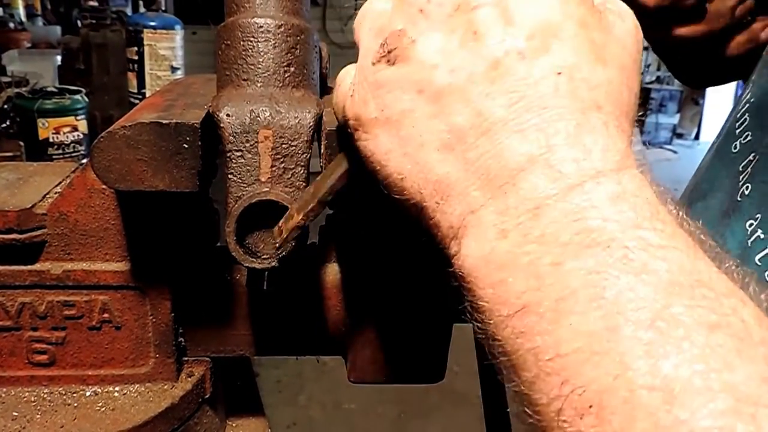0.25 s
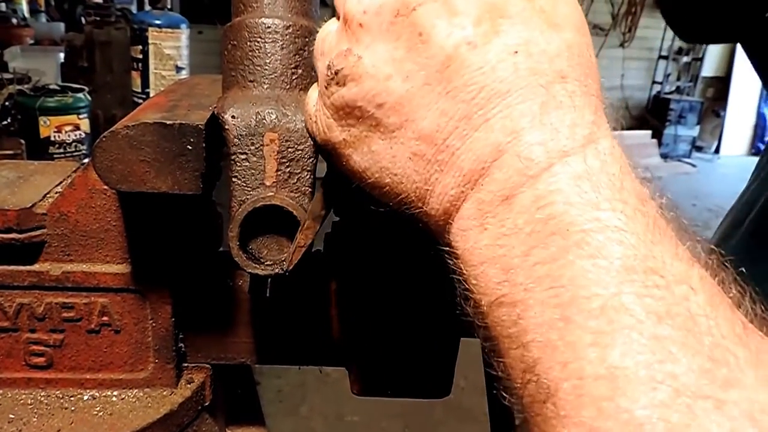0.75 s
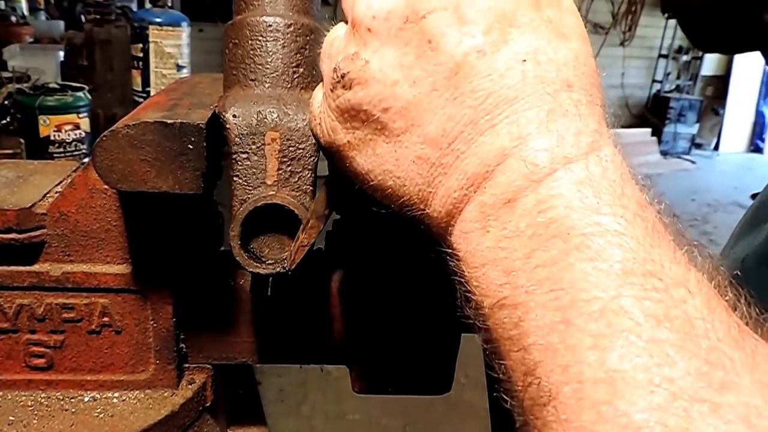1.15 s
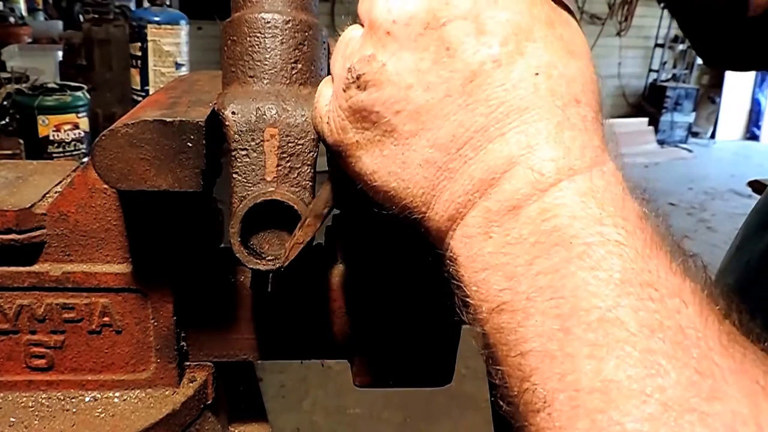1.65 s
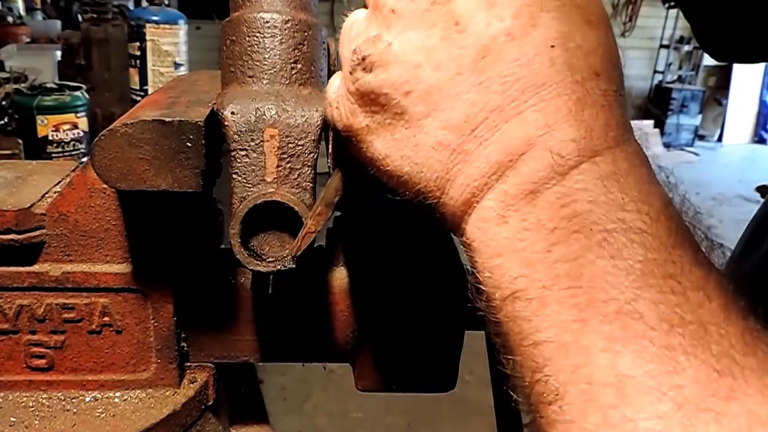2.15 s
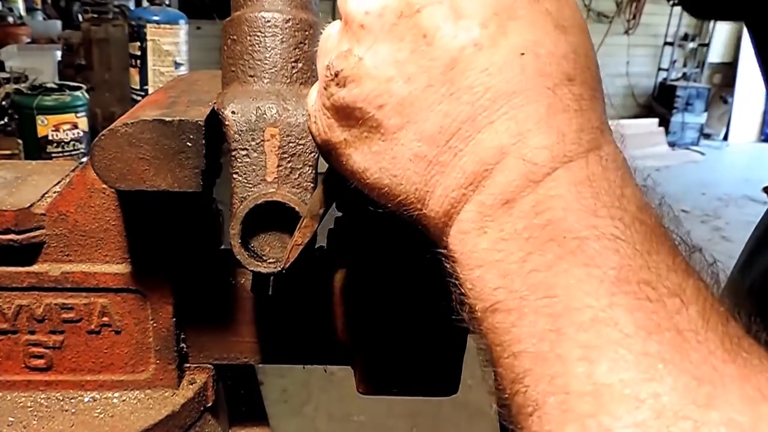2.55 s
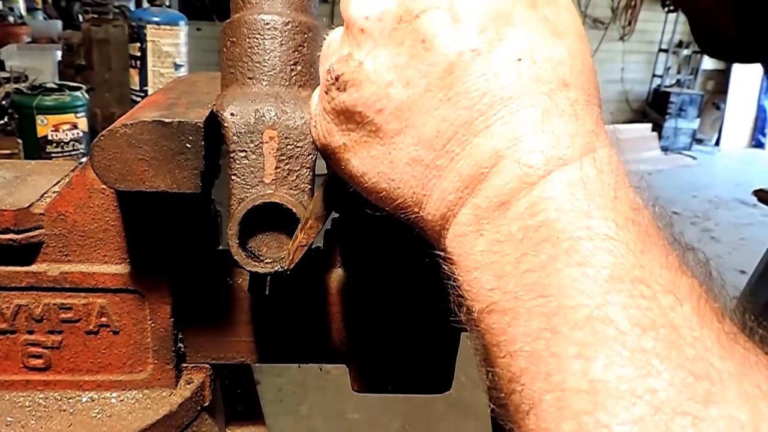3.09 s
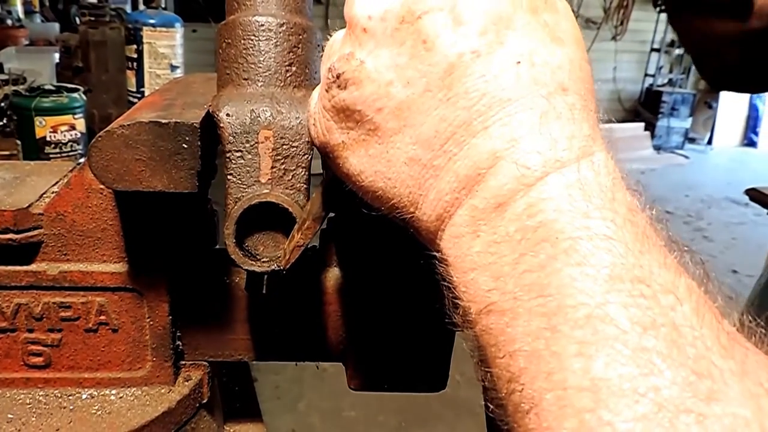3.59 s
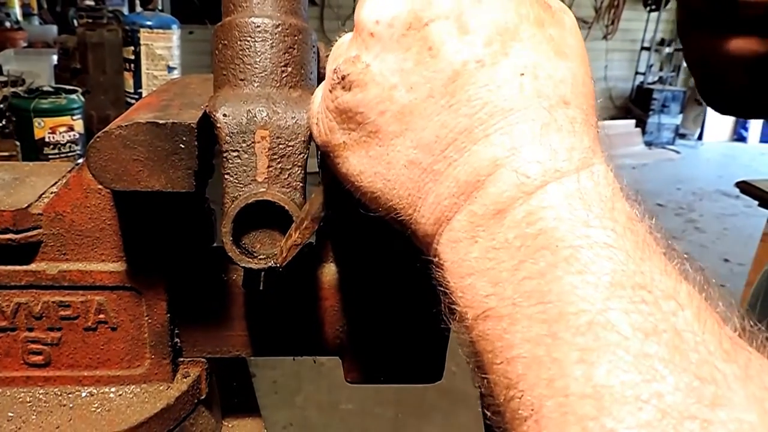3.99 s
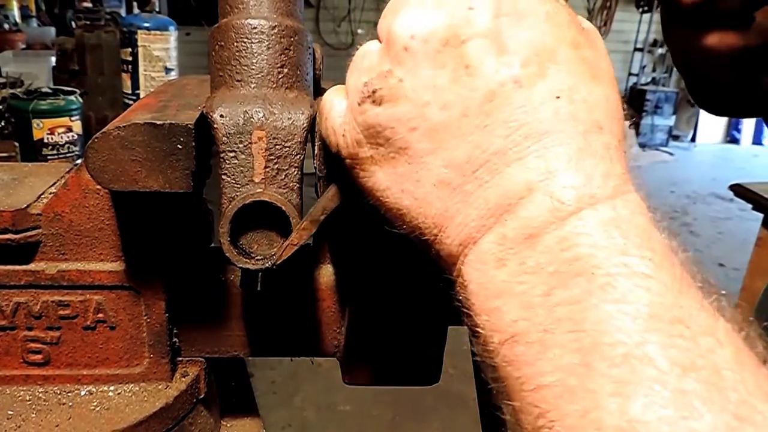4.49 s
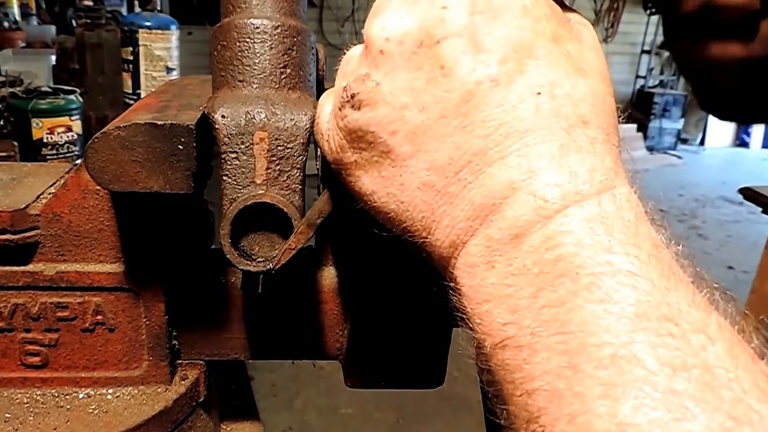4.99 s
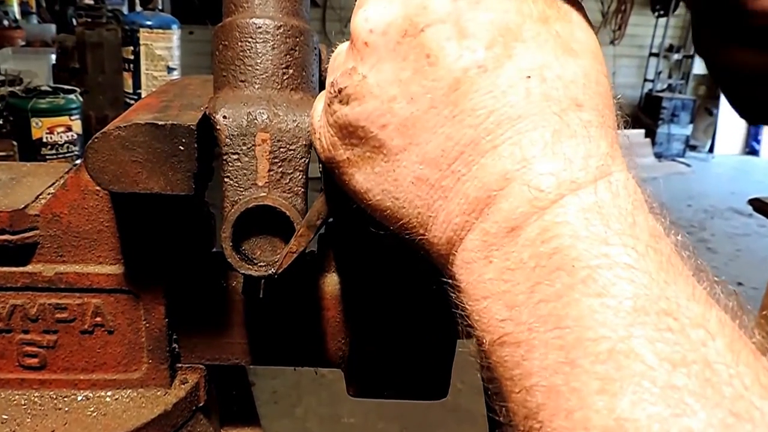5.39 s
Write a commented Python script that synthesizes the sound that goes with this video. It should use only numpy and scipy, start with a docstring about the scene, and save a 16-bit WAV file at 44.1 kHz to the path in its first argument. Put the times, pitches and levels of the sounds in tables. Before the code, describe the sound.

A steel hammer strikes a chisel against a metal part clamped in a bench vise, sharp uneven blows over a low swelling rumble.

```python
"""Hammer and chisel at a bench vise

A steel hammer drives a chisel against a shaft yoke clamped in a bench vise, close to the microphone.
Each blow mixes bursts of noise (crack, edge, noisy thud) with fading sine waves (bench thump, steel ring).
Light taps leave the chisel free to sing, heavy blows seat it and ring the hammer head instead.
An echo of shaped noise follows; the hardest blows overload the input, which rounds off their peaks.
Behind it, shaped noise rumbles and a wavering sine hums, swelling and sinking about every two seconds."""
import sys
import numpy as np
from scipy import signal
from scipy.fft import rfft, irfft
from scipy.io import wavfile
from scipy.ndimage import uniform_filter1d

SR = 44100
rng = np.random.default_rng(int(sys.argv[2]) if len(sys.argv) > 2 else 0)


def unload_audio(sound):
    """Save the sound as a 16-bit wav file, at the path given as the first command line argument."""
    columns = np.transpose(np.atleast_2d(sound))
    # keep every value between -1 and 1, then stretch to whole-number steps
    steps = np.round(np.clip(columns, -1, 1) * 32767)
    wavfile.write(sys.argv[1], SR, steps.astype(np.int16))


N = 248724  # length in samples

# level of the background, before rumble and hum get their own: (t/s, level/dB)
SWELL = [(0, -40.0), (0.26, -38.5), (0.85, -23.5), (0.98, -28.0), (1.17, -27.5), (1.7, -38.5),
         (2.15, -40.5), (2.87, -23.5), (3.15, -28.5), (3.75, -39.5), (4.5, -45.5), (4.95, -35.5),
         (5.35, -35.5), (5.64, -36.0)]
# colour of the rumble: (f/Hz, level per Hz/dB)
RUMBLE = [(47, -38.5), (80, 3.5), (117, -11.5), (162, 0), (227, -11), (264, -1.5), (326, -6.5), (379, -3.5),
          (459, -5.5), (645, -10.5), (833, -11), (1170, -15), (3470, -35), (6580, -49), (13000, -57),
          (15000, -75)]
# how alike the rumble is left and right, 1 = the same: (f/Hz, likeness)
LIKENESS = [(60, 0.93), (300, 1), (700, 0.88), (1400, 0.57), (3000, 0), (7000, 0.051)]
# every blow or light tap; hardness, skid and looseness are 0 for the usual square blow:
# (t/s, force/dB, hardness of the contact/dB, skid/dB, looseness of the chisel/dB, clank f/Hz)
BLOWS = [(0.447, -34.5, -8, 0, 4, 2000), (0.632, -31, -15, 3, 4, 1800), (0.8986, -17.5, -20, 1, 0, 1800),
         (1.202, -8.5, -3, 0, 8, 4300), (1.499, -13, 0, 0, 3, 2460), (1.7864, -19, 3, -1, 0, 2460),
         (2.344, -31, -14, 0, 0, 1800), (2.494, -33, 0, -2, 0, 2500), (2.932, -7, -3, 1, -3, 4370),
         (3.2506, -9, 0, 0, -2, 4400), (3.571, -14, 4, -1, -3, 4240), (3.8897, -18, 5, -1, 1, 4240),
         (4.2304, -45, 24, -4, 0, 4800), (4.9867, -27, -7, 9, 0, 2400), (5.4369, -15.5, -1.5, 1, 0, 2600)]
# colour of the crack: (f/Hz, level per Hz/dB)
CRACK = [(500, -6), (1300, -1), (1900, -5), (2450, 5.5), (3200, -0.5), (3700, 1), (4350, -1.5), (5100, -15),
         (7000, -24), (12000, -61)]
# colour of the contact edge: (f/Hz, level per Hz/dB)
EDGE = [(3000, -15), (5000, 2), (5900, -3.5), (7400, 4), (9400, -6.5), (11300, -3), (12200, 1), (13400, -9),
        (15300, -8), (16300, -23)]
# ringing tones of vise and bench: (f/Hz, level/dB, time to fade by 60 dB/s)
BENCH = [(67.6, -14, 0.26), (139.5, -13.5, 0.037), (184.8, -4.5, 0.091), (286.4, -1, 0.068),
         (326.4, -0.5, 0.063), (398, -10, 0.091), (465.7, -11.5, 0.095), (542, 3.5, 0.052),
         (625.3, 5.5, 0.044), (768, -8.5, 0.034), (878, -9, 0.083), (1037, -3.5, 0.053),
         (1196, -11.5, 0.067), (1339, -3, 0.038), (1498, -8, 0.071), (1603, -10.5, 0.049)]
# colour of the rough, noisy part of the thud: (f/Hz, level per Hz/dB)
NOISY_THUD = [(40, -24.5), (120, -13.5), (250, 5.5), (420, 4), (650, 4.5), (1000, -4), (1500, -8.5),
              (2000, -11), (3500, -34), (9000, -66)]
# ringing tones of the hammer head and the seated chisel: (f/Hz, level/dB, time to fade by 60 dB/s)
STEEL = [(2480, -2, .3), (3630, -2, .25), (3900, -2, .35), (4270, -1, .25), (4365, -4, .3), (5240, -12, .3),
         (7800, -16, .3), (12025, 5, .3), (12190, 0, .18), (12300, -6, .15), (12810, -8, .23),
         (15000, -14, .18)]
# ringing tones of the chisel when it sits loosely: (f/Hz, level/dB, time to fade by 60 dB/s)
CHISEL = [(4790, -3, .45), (4900, -1, .25), (8473, -5, .5), (8600, -4, .4), (10480, -8, .3),
          (13320, -2, .2)]
# how long the workshop echo lasts: (f/Hz, time to fade by 60 dB/s)
ROOM_T60 = [(100, .5), (500, 0.4), (2000, 0.57), (4500, 0.53), (8000, 0.52), (13000, 0.42)]
# how strong the workshop echo is: (f/Hz, level/dB)
ROOM_LEVEL = [(100, -34), (400, -17), (1200, -8), (3000, -13), (7000, -13.5), (12000, -13), (14000, -33)]

# what a blow sets off: (level against its force/dB, gain per dB of hardness/dB)
CRACK_LAW = (-7.3, .55)
EDGE_LAW = (-18, .98)
THUMP_LAW = (-1.5, 0)
NOISY_THUD_LAW = (-7, -.3)
STEEL_LAW = (-38.5, .95)
CHISEL_LAW = (-49, .95)

HUM_HZ = 59.2
CUTOFF_HZ = 16100
USUAL_FORCE_DB = -14
NOISY_THUD_PER_SKID = 0.55  # dB per dB: a skidding blow also has a stronger noisy thud
SEATING = 0.55  # dB of chisel ring damped per dB of force
THUMP_DULLING = 0.25  # dB per octave lost per dB of force: heavy blows reach the low modes of the bench
CRACK_BRIGHTENING = 0.11  # dB per octave gained per dB of hardness, lost per dB of skid


def amp(db):
    """Turns decibels into gain."""
    return 10 ** (np.asarray(db) / 20)


def unit(x):
    """Scales a sound to rms 1."""
    return x / np.sqrt(np.mean(x ** 2) + 1e-20)


def unit_hit(x):
    """Scales a hit to rms 1 over its first 25 ms."""
    return x / np.sqrt(np.mean(x[..., :SR // 40] ** 2) + 1e-20)


def read(points, hz):
    """Reads between the rows of a table, on a log-frequency axis."""
    f, value = np.transpose(points)
    return np.interp(np.log(hz + 1), np.log(f + 1), value)


def add(mix, s, sound):
    """Mixes a sound into both channels at time s, cut off at the end of the mix."""
    start = max(round(s * SR), 0)
    part = mix[:, start:][:, :sound.shape[-1]]
    part += sound[..., :part.shape[1]]


def colour(x, points):
    """Makes each frequency of x louder or softer as a table says."""
    length = x.shape[-1]
    gain = amp(read(points, np.fft.rfftfreq(length, 1 / SR)))
    return irfft(rfft(x) * gain, length)


def wander(rate_hz):
    """Makes a random drift of rms 1 by keeping mainly the noise below rate_hz."""
    hz = np.fft.rfftfreq(N, 1 / SR)
    slow = rfft(rng.standard_normal(N)) / (1 + (hz / rate_hz) ** 4)
    return unit(irfft(slow, N))


def dying(t, t60):
    """Exponential fade that starts at t = 0 and falls by 60 dB in t60 seconds."""
    return (t >= 0) * amp(-60 * np.maximum(t, 0) / t60)


def rumble(patch_db=1.0, flutter_db=0.3):
    """Dark uneven noise, alike in both ears in the bass and more separate in the treble."""
    frames, hz = N // 256 + 5, np.fft.rfftfreq(1024, 1 / SR)
    a, b, c, d, patches = rng.standard_normal((frames, 513, 5)).T
    # patches of louder and softer noise, smoothed over frequency and then over time
    patches = uniform_filter1d(patches, 8, 0)
    patches = unit(uniform_filter1d(patches, 10, 1))
    same = np.clip(read(LIKENESS, hz), -1, 1)[:, None]
    left = a + 1j * b
    right = same * left + np.sqrt(1 - same ** 2) * (c + 1j * d)
    spectrum = np.array([left, right]) * amp(patch_db * patches)
    noise = signal.istft(spectrum, nperseg=1024, noverlap=768)[1][:, :N]
    return unit(colour(noise, RUMBLE)) * amp(flutter_db * wander(17))


def hum(drift_hz=0.74, waver_db=2.3, blur=0.44, blur_hz=11):
    """A low sine whose pitch and level waver, in a narrow band of noise."""
    turn = 2 * np.pi * np.cumsum(HUM_HZ + drift_hz * wander(3.2)) / SR
    line = np.sin(turn) * amp(waver_db * wander(6.6))
    narrow_noise = wander(blur_hz) * np.sin(turn) + wander(blur_hz) * np.cos(turn)
    return unit(line + blur * narrow_noise)


def burst(grain, t, spectrum, t60, rise, fresh=0.83, tilt_db=0):
    """Dense short-lived modes, as noise: part of the pattern returns at each blow, part is new."""
    tilted = [(hz, db + tilt_db * np.log2(hz)) for hz, db in spectrum]
    modes = colour(grain + fresh * rng.standard_normal(grain.shape), tilted)
    return unit_hit(modes * dying(t, t60) * (1 - np.exp(-t / rise)))


def clank(x, hz, lift_db=5, q=4):
    """The way the chisel sits favours one broad resonance of the steel."""
    favoured = signal.lfilter(*signal.iirpeak(hz, q, fs=SR), x)
    return unit_hit(x + (amp(lift_db) - 1) * favoured)


def thump(t, tilt_db, lag_s=0.001602, rise_s=0.0018, echo_s=0.0071, echo=0.28,
          rebound_s=0.01, rebound=0.39, right_lag_s=0.00012, scatter_db=1.6):
    """The blow passes through the vise into the bench; a near surface returns it and the vise rocks back."""
    sizes = scatter_db * rng.standard_normal(len(BENCH))  # no two blows land on quite the same spot

    def boards(u):
        """The bench tones build up softly, then fade one by one."""
        u = np.maximum(u, 0)
        modes = 0
        for (hz, db, t60), size in zip(BENCH, sizes):
            level = amp(db + size + tilt_db * np.log2(hz))
            modes = modes + level * dying(u, t60) * np.sin(2 * np.pi * hz * u)
        return modes * (1 - np.exp(-u / rise_s))

    late = t - lag_s - np.array([[0], [right_lag_s]])  # the right channel hears it a little later
    return unit_hit(boards(late) + echo * boards(late - echo_s) + rebound * boards(late - rebound_s))


def ring(modes, t):
    """High steel tones: each blow stirs them differently, and each channel hears its own phase."""
    sound = 0
    for hz, db, t60 in modes:
        level = amp(db + 2.2 * rng.standard_normal())
        wave = np.sin(2 * np.pi * (hz * t + rng.random((2, 1))))
        sound = sound + level * dying(t, t60) * wave
    return sound


def hammering():
    """Each blow is a crack, edge, thump, noisy thud and ring, mixed by its force and hardness of contact."""
    t = np.arange(int(SR * 0.45)) / SR
    brief = t[:SR // 8]
    grain = rng.standard_normal((2, len(brief)))  # the part of the pattern that returns at each blow
    out = np.zeros((2, N))
    for s, force_db, hard_db, skid_db, loose_db, clank_hz in BLOWS:
        heavy_db = force_db - USUAL_FORCE_DB
        tilt_db = CRACK_BRIGHTENING * (hard_db - skid_db)
        crack = burst(grain, brief, CRACK, t60=0.047, rise=0.00012, tilt_db=tilt_db)
        crack = clank(crack, clank_hz)
        edge = burst(grain, brief, EDGE, t60=0.037, rise=0.00018, tilt_db=min(tilt_db, 0))
        bench = thump(brief, -THUMP_DULLING * heavy_db)
        # mostly fresh noise, so that the thud varies from blow to blow
        noisy_thud = burst(grain[0], brief, NOISY_THUD, t60=0.067, rise=0.0044, fresh=4.6)
        layers = [
            (CRACK_LAW, amp(skid_db) * crack),
            (EDGE_LAW, edge),
            (THUMP_LAW, bench),
            (NOISY_THUD_LAW, amp(NOISY_THUD_PER_SKID * skid_db) * noisy_thud),
            (STEEL_LAW, amp(-loose_db) * ring(STEEL, t)),
            (CHISEL_LAW, amp(loose_db - SEATING * heavy_db) * ring(CHISEL, t))]
        for (level_db, per_hardness), sound in layers:
            add(out, s, amp(force_db + level_db + per_hardness * hard_db) * sound)
    return out


def workshop(x, first_s=0.0084, build_s=0.01):
    """A diffuse echo: noise whose treble and bass each fade at their own speed smears every blow."""
    hz, t, z = signal.stft(rng.standard_normal((2, SR)), SR, nperseg=256)
    t60 = read(ROOM_T60, hz)[:, None]
    strength = amp(read(ROOM_LEVEL, hz))[:, None]
    even_energy = np.sqrt(2 * np.log(1000) / (t60 * SR))  # a longer fade adds no energy
    z = z * dying(t, t60) * strength * even_energy
    tail = signal.istft(z, SR, nperseg=256)[1]
    tail_time = np.arange(tail.shape[1]) / SR
    tail = tail * np.clip((tail_time - first_s) / build_s, 0, 1)
    return signal.fftconvolve(x, tail, axes=1)[:, :N]


def scene(rumble_db=2.2, hum_db=-1.5):
    """The blows and their echo over the swelling background."""
    swell = amp(np.interp(np.arange(N) / SR, *np.transpose(SWELL)))
    background = swell * (amp(rumble_db) * rumble() + amp(hum_db) * hum())
    blows = hammering()
    return blows + workshop(blows) + background


def record(dry):
    """The input rounds off the highest peaks; then a filter removes the top of the treble."""
    held = dry / (1 + dry ** 8) ** (1 / 8)
    lowpass = signal.firwin(511, CUTOFF_HZ, window=("kaiser", 9), fs=SR)
    return signal.oaconvolve(held, lowpass[None], "same", axes=1)


dry = scene()
out = record(dry)
unload_audio(out)
```